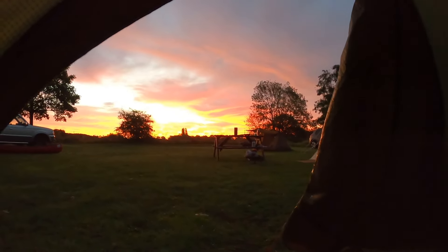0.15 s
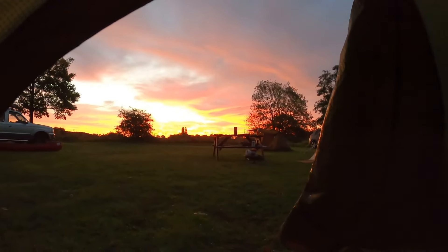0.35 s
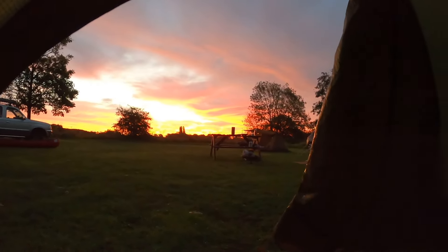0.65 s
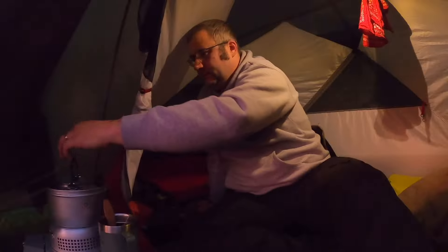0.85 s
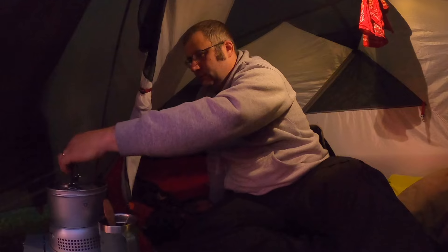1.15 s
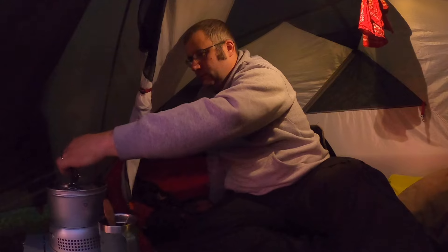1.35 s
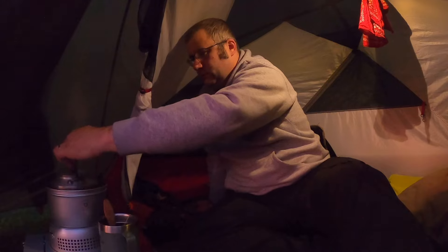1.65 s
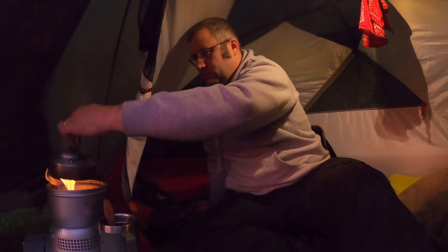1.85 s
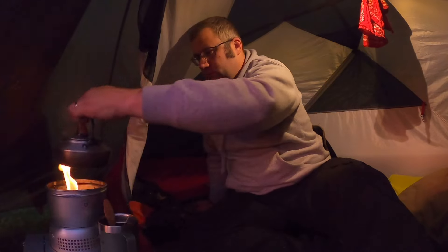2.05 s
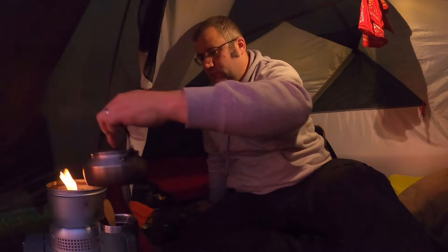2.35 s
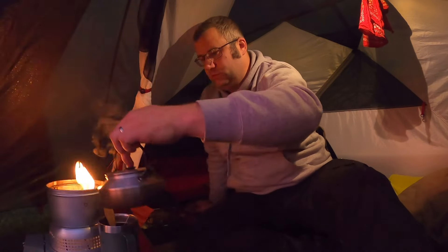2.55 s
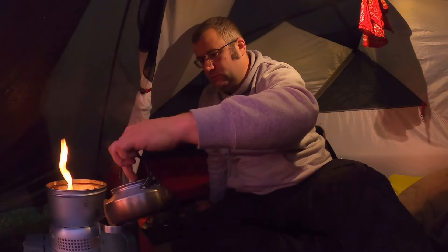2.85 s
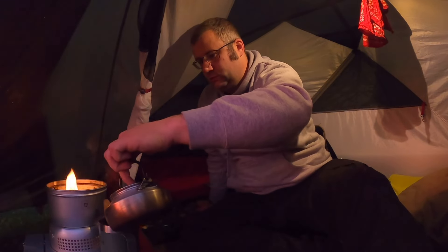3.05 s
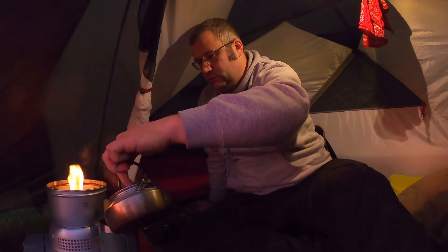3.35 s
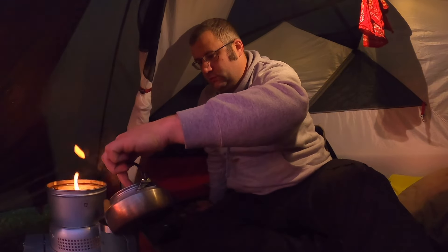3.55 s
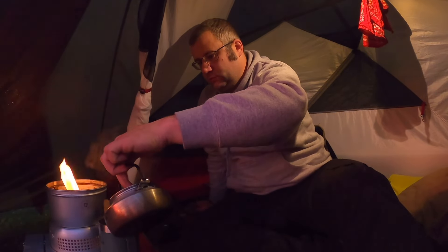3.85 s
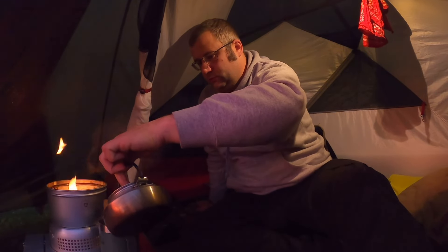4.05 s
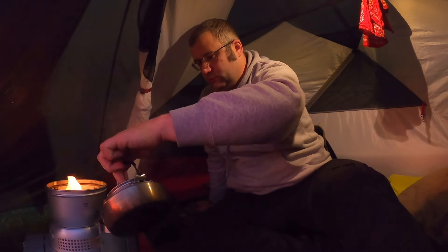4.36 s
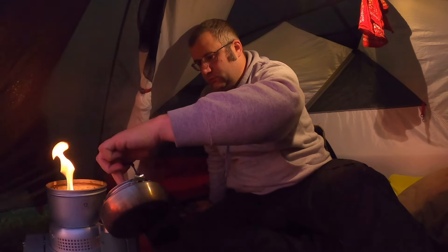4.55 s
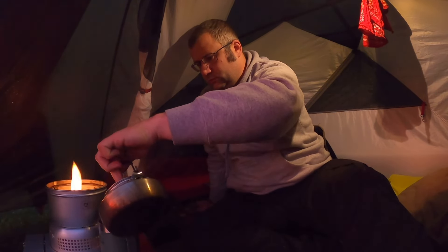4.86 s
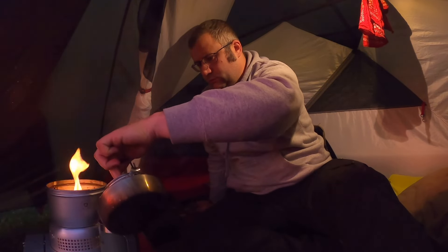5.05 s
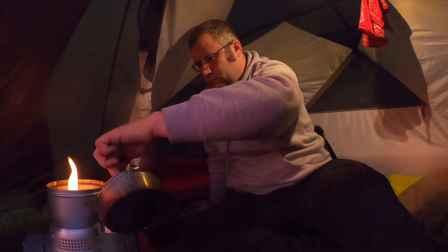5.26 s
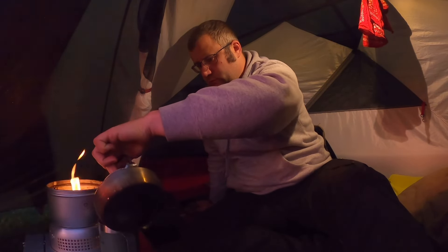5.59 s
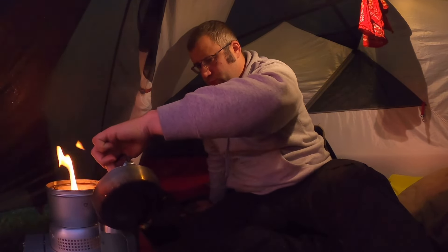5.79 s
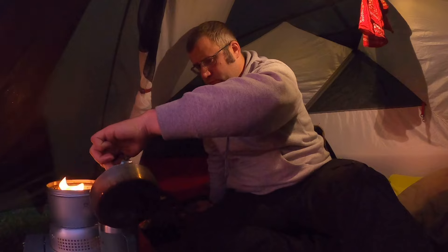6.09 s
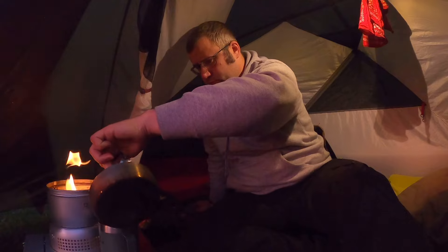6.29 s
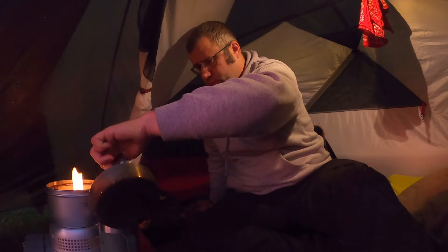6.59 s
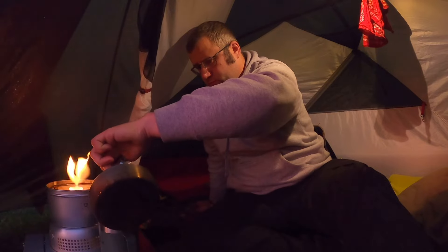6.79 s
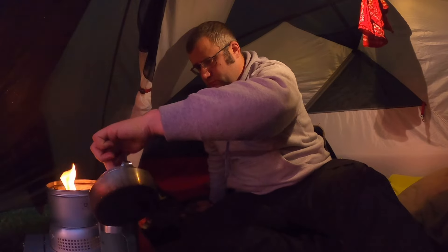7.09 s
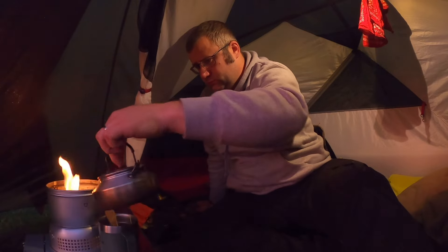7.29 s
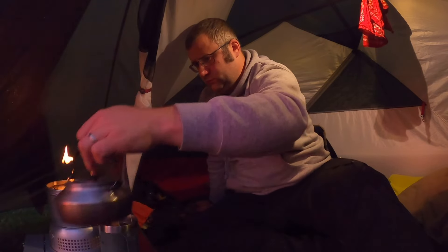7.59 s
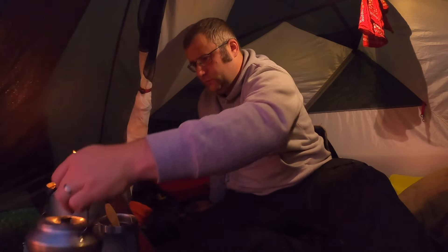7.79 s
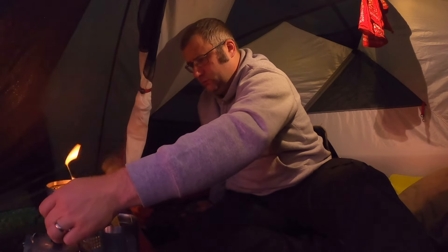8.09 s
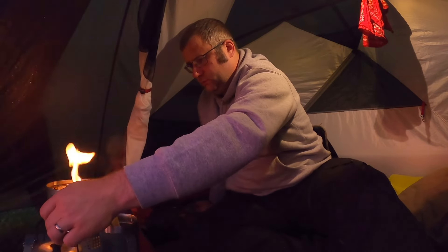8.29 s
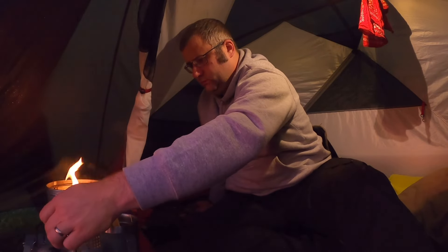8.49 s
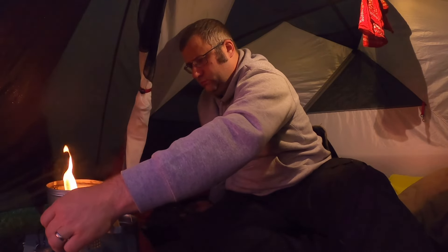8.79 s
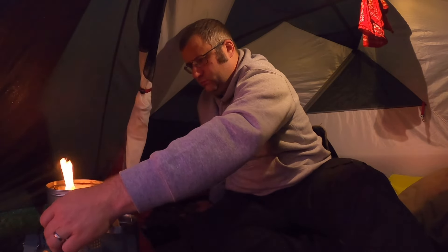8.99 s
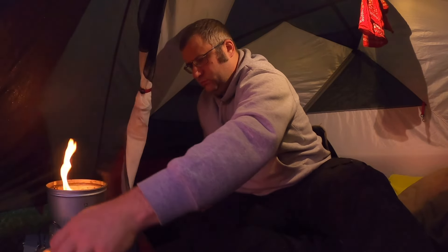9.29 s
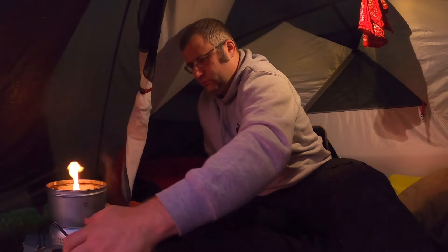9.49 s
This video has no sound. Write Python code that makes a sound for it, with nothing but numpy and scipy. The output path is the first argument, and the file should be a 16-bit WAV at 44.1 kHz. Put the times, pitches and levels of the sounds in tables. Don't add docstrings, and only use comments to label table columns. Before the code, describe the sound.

Quick sweeping birdsong cuts to a steaming kettle, a trickling pour ringing in a metal mug, a hard metallic clank, and a final three-note bird whistle.

```python
import sys
import numpy as np
from scipy import signal
from scipy.io import wavfile

SR = 44100
rng = np.random.default_rng(int(sys.argv[2]) if len(sys.argv) > 2 else 0)


def attenuation_scalar(level_db):
    decades = np.asarray(level_db, float) / 20
    return 10 ** decades


def master(y):
    cut = np.clip(np.atleast_2d(y).T, -1, 1)
    pcm = np.round(cut * 32767)
    wavfile.write(sys.argv[1], SR, pcm.astype(np.int16))


N = 425124
CHANGE_S = .7631

# f/Hz, level/dB, time to fade by 60 dB/s
MUG = [(866, -17, 0.091), (938, -17, 0.2), (1500, -9, 0.11), (2160, 0.5, 0.0097), (2680, -6, 0.042),
       (4290, -1, 0.017), (5900, -2.5, 0.019)]


def rms_one(x):
    return x / np.sqrt(np.mean(x ** 2) + 1e-20)


def in_time(rows):
    s, *columns = np.transpose(rows)
    return [np.interp(np.arange(N) / SR, s, c) for c in columns]


def ramp(span):
    return np.interp(np.arange(N) / SR, span, (0, 1))


def sounding(rows, db):
    t = np.arange(N) / SR
    start, end = rows[0][0], rows[-1][0]
    fades = np.minimum(t - start, end - t) * 10 + (start < 1)
    return attenuation_scalar(db) * np.clip(fades, 0, 1) * (t >= start)


def at_hz(points, hz):
    points = np.array(points)
    return np.interp(np.log(hz), np.log(points[:, 0]), points[:, 1])


def drift(rate):
    r = np.exp(-80 * np.pi * rate / SR)
    slow = signal.lfilter([1], [1, -2 * r, r * r], rng.standard_normal(N // 40 + 2002))[2000:]
    return np.interp(np.arange(N) / 40, np.arange(len(slow)), rms_one(slow))


def ring(clicks, hz, t60):
    r = attenuation_scalar(-60 / (t60 * SR))
    w = 2 * np.pi * hz / SR
    return signal.lfilter([0, np.sin(w)], [1, -2 * r * np.cos(w), r * r], clicks + 1e-18)


def band(x, low_hz, high_hz):
    return signal.sosfilt(signal.butter(2, [low_hz, high_hz], "band", fs=SR, output="sos"), x)


def low_pass(x, order, hz):
    return signal.sosfilt(signal.butter(order, hz, fs=SR, output="sos"), x)


def pan(x, left_db):
    return x * attenuation_scalar([[left_db / 2], [-left_db / 2]])


def banded_noise(spectrum, patchy_db, flicker, count):
    # f/Hz, likeness from 0 to 1
    likeness = [(60, 0.84), (150, 0.98), (380, 0.53), (940, 0.52), (2360, 0.79), (5910, 0.43),
                (14800, 0.083)]
    edges = np.geomspace(spectrum[0][0], spectrum[-1][0], count + 1)
    centres = np.sqrt(edges[1:] * edges[:-1])
    white, together, bands = rng.standard_normal((2, 2, N)), drift(4.6), []
    for k, hz in enumerate(centres):
        mid, side = band(white[k % 2], edges[k], edges[k + 1])
        alike = np.clip(at_hz(likeness, hz), 0, 1)
        gain = attenuation_scalar(at_hz(spectrum, hz) + patchy_db * (0.15 * together + drift(flicker)))
        bands.append(gain * (np.sqrt(1 + alike) * mid + np.sqrt(1 - alike) * side * [[1], [-1]]))
    bands = np.array(bands)
    return centres, bands / np.sqrt(np.mean(np.sum(bands, axis=0) ** 2))


def whistle(notes, rough_db, waver):
    out = np.zeros(N)
    flutter = attenuation_scalar(rough_db * drift(62))
    wobble = 1 + waver * drift(59)
    for rows in notes:
        s, hz, db = np.transpose(rows)
        at = np.arange(int(s[0] * SR), min(int(s[-1] * SR), N))
        t = at / SR
        ends = np.clip(np.minimum(t - s[0], s[-1] - t) / 0.0013, 0, 1)
        phase = np.cumsum(2 * np.pi * np.interp(t, s, hz) * wobble[at] / SR)
        out[at] += np.sqrt(2) * attenuation_scalar(np.interp(t, s, db)) * ends * flutter[at] * np.sin(phase)
    return out


def scatter(x, t60, wet_db, alike):
    t = np.arange(int(.6 * SR)) / SR
    mid, side = rng.standard_normal((2, len(t))) * attenuation_scalar(-60 * t / t60) * np.clip(t / 0.0061, 0, 1)
    cloud = mid + np.sqrt(np.clip(1 - alike, 0, 1)) * side * np.array([[1], [-1]])
    cloud = cloud / np.sqrt(np.sum(mid ** 2))
    return attenuation_scalar(wet_db) * signal.fftconvolve(x[None], cloud, axes=1)[:, :N]


def strike(hits, modes, shorten, crack_db, crack_hz):
    at = np.array([round(s * SR) for s, db in hits])
    db = np.array(hits)[:, 1]
    first, span = at[0], at[-1] - at[0] + SR // 2
    chance = rng.standard_normal((len(hits), len(modes)))
    out, clicks = np.zeros(N), np.zeros(span)
    for k, (hz, level_db, t60) in enumerate(modes):
        clicks[at - first] = attenuation_scalar(db + level_db + 1.1 * chance[:, k]) * np.sign(chance[:, 0])
        out[first:first + span] += ring(clicks, hz, np.clip(t60 * shorten, .01, .4))
    clicks[at - first] = attenuation_scalar(db + crack_db)
    fading = signal.lfilter([1], [1, -np.exp(-1 / (0.0015 * SR))], clicks + 1e-18)
    out[first:first + span] += band(fading * rng.standard_normal(span), crack_hz / 8, crack_hz)
    return out


def splashes(rows, splash_s, cycles, ring_db, mug_db, above):
    t = np.arange(int(.08 * SR)) / SR
    spray, rings = np.zeros((4, N + len(t))), np.zeros(N + len(t))
    noise = rng.standard_normal((len(rows), len(t))) * np.exp(-t / splash_s) * np.clip(t / .0012, 0, 1)
    for (s, peak_db, hz, spray_db, narrow_db), puff in zip(rows, noise):
        octaves_off = np.abs(np.log2(np.array((1150, 2500, 4950, 11000)) / (above * hz)))
        at = slice(round(s * SR), round(s * SR) + len(t))
        spray[:, at] += attenuation_scalar(spray_db - narrow_db * octaves_off)[:, None] * puff
        life = cycles / np.sqrt(hz * 1000)
        tone = np.sin(2 * np.pi * hz * t * (1 + 0.0266 * t / life))
        rings[at] += attenuation_scalar(peak_db + ring_db) * np.exp(-t / life) * np.clip(t * hz, 0, 1) * tone
    out = rings[:N]
    lows, highs, lifts_db = (730, 1800, 3500, 9000), (1800, 3500, 7000, 15000), (14.0, 13.5, 12, 15)
    for part, low_hz, high_hz, lift_db in zip(spray[:, :N], lows, highs, lifts_db):
        body = sum(attenuation_scalar(db + mug_db) * ring(part, hz, t60)
                   for hz, db, t60 in MUG if low_hz * 1.05 < hz < high_hz * 1.05)
        out = out + attenuation_scalar(lift_db) * (band(part, low_hz, high_hz) + body)
    return out


def road():
    # t/s, level/dB
    traffic = [
        (0, -60),
        (.76, -48.5),
        (1.0, -60),
        (2.2, -60),
        (4.3, -55.5),
        (4.7, -59),
        (5.7, -54),
        (9.64, -57.5),
    ]
    # f/Hz, level per Hz/dB
    rumble_colour = [(20, -12.5), (36, -9.5), (50, -2.5), (70, -7.5), (100, -5.5), (170, -8.5), (230, -11),
                     (330, -19.5), (420, -41.5)]
    # t/s, f/Hz, level/dB
    engine_path = [
        (7.6, 71.4, -67.5),
        (9.64, 71.57, -63.5),
    ]
    # multiple of the firing pitch, level/dB
    orders = [(1, -13), (2, 0.5), (3, 3.5), (4, -4.5)]
    deep_db, = in_time(traffic)
    upper_db = -64.5 + 0.075 * (deep_db - deep_db.mean())
    centres, bands = banded_noise(rumble_colour, patchy_db=2.5, flicker=6.9, count=11)
    deep, upper = rms_one(bands[centres < 90].sum(axis=0)), rms_one(bands[centres >= 90].sum(axis=0))
    hz, db = in_time(engine_path)
    phase = np.cumsum(2 * np.pi * hz * (1 + 0.02 * drift(8.23)) / SR)
    engine = sum(attenuation_scalar(level_db + 5.0 * drift(9) - 2) * np.sin(k * phase) for k, level_db in orders)
    lumps = attenuation_scalar(2.02 * drift(7.7))
    noise = lumps * (attenuation_scalar(deep_db) * deep + attenuation_scalar(upper_db + 2.5) * upper)
    return noise + sounding(engine_path, db) * engine


def field():
    # f/Hz, level per Hz/dB
    air_colour = [(330, -15.5), (500, -11.5), (900, -12.5), (1250, -5), (1600, -8), (2000, -11.5),
                  (3400, -21.5), (4000, -19.5), (4800, -24), (6500, -6), (8500, -45), (12500, -25),
                  (15000, -51)]
    # f/Hz, level per Hz/dB
    chorus_colour = [(3500, -15), (4300, -6.5), (5000, -0.5), (6000, -2.5), (7000, -0.5), (8200, -34.5)]
    # t/s, level/dB
    chorus_level = [(0, -64.5), (.76, -65), (.81, -60.5), (2.3, -71), (3.05, -74.5), (3.5, -69),
                    (4.1, -71.5), (4.8, -78), (5.6, -76), (6.2, -77), (7.4, -68), (8.0, -81.5), (9.64, -82)]
    chorus_db, = in_time(chorus_level)
    outdoors = int(CHANGE_S * SR)
    centres, air = banded_noise(air_colour, patchy_db=2.4, flicker=9.3, count=18)
    air[centres > 6800, :, :outdoors] *= attenuation_scalar(-8)
    hollow = attenuation_scalar(-7.5) * rms_one(ring(rng.standard_normal(N), 1270, 0.037))
    centres, chorus = banded_noise(chorus_colour, patchy_db=1.6, flicker=5, count=10)
    chorus[centres > 6500, :, :outdoors] *= attenuation_scalar(-6)
    out = attenuation_scalar(-70.5) * (air.sum(axis=0) + hollow) + attenuation_scalar(chorus_db) * chorus.sum(axis=0)
    dull = low_pass(out, 16, 6500) + attenuation_scalar(-6 + 5 * drift(15)) * band(out, 7800, 12000)
    return np.where(np.arange(N) < CHANGE_S * SR, dull, out)


def falling_notes():
    # t/s, level/dB
    falling = [
        (5.915, -72),
        (6.1, -68),
        (6.287, -71.5),
        (6.494, -66),
        (6.803, -68.5),
    ]
    notes = [[(s, 2350, db), (s + 0.022, 1300, db - 2)] for s, db in falling]
    return whistle(notes, rough_db=1.5, waver=0.03)


def far_whistles():
    # t/s, length/s, from f/Hz, to f/Hz, level/dB
    whistles = [(0.799, 0.095, 5370, 5320, -55.5), (0.814, 0.079, 6000, 5600, -64),
                (2.07, 0.065, 5120, 5140, -63.5), (3.3, .06, 5430, 5480, -78),
                (3.342, 0.084, 6100, 5970, -75), (6.595, 0.13, 5300, 5280, -79.5),
                (3.43, 0.18, 5900, 5750, -67.5), (3.436, 0.2, 5480, 5320, -65.5),
                (7.519, 0.13, 6710, 6620, -74), (7.853, 0.16, 5440, 5135, -62.5),
                (7.865, 0.13, 5800, 5640, -68), (8.308, 0.22, 4820, 4870, -77),
                (8.817, 0.11, 7540, 7560, -71), (8.968, 0.033, 4650, 4480, -69),
                (9.387, 0.08, 3780, 3640, -67)]
    shape = ((0, -8), (.15, 0), (.8, -3), (1, -14))
    notes = [[(s + share * length, a + share * (b - a), db + loss_db) for share, loss_db in shape]
             for s, length, a, b, db in whistles]
    return whistle(notes, rough_db=4.5, waver=0.0039)


def quick_glides():
    # t/s, length/s, from f/Hz, to f/Hz, level/dB
    glides = [(2.058, .016, 4760, 5100, -68), (2.447, 0.046, 4970, 5310, -67),
              (2.48, 0.017, 5220, 6440, -58.5), (2.567, 0.051, 4650, 4640, -71),
              (2.608, 0.024, 4620, 5300, -58), (2.726, 0.039, 4510, 6500, -60),
              (2.846, 0.045, 4470, 6720, -59.5), (6.266, .03, 5030, 5530, -74),
              (6.586, 0.021, 5060, 5500, -73), (6.868, 0.031, 2200, 1750, -74),
              (2.98, 0.05, 7350, 7500, -75), (3.027, .07, 7500, 7400, -78), (4.92, .08, 7800, 7730, -72),
              (9.563, 0.021, 4300, 8300, -64), (9.593, 0.023, 7380, 5100, -52),
              (9.603, 0.035, 7800, 7200, -59), (9.625, 0.012, 6270, 7400, -46.5)]
    notes = [[(s, a, db), (s + length, b, db - 9)] for s, length, a, b, db in glides]
    return whistle(notes, rough_db=2.0, waver=0.012)


def three_note_song():
    # t/s, f/Hz, level/dB
    high = [
        (8.972, 6400, -68),
        (8.99, 6590, -58),
        (9.04, 6760, -50.5),
        (9.09, 6830, -59),
        (9.108, 6630, -65),
    ]
    middle = [
        (9.102, 4810, -62),
        (9.14, 4540, -51),
        (9.161, 4560, -51),
        (9.185, 4300, -61),
        (9.198, 3800, -69),
    ]
    low = [
        (9.198, 3420, -61),
        (9.227, 3550, -53),
        (9.286, 3363, -51.5),
        (9.379, 3314, -56.5),
        (9.41, 3150, -52),
        (9.443, 3364, -58),
        (9.475, 3230, -89),
        (9.54, 3310, -81),
    ]
    return whistle([high, middle, low], rough_db=2.5, waver=0.0051)


def hooked(rows, hook, shape_db):
    start, top_at, middle_at, fall_left = hook
    return [[(s, start * top, db + shape_db[0]),
             (s + top_at * length, top, db + shape_db[1]),
             (s + middle_at * length, end + fall_left * (top - end), db + shape_db[2]),
             (s + length, end, db + shape_db[3])]
            for s, length, top, end, db in rows]


def near_bird():
    # t/s, length/s, top f/Hz, end f/Hz, level/dB
    upper = [(.115, 0.044, 6730, 5560, -44), (.227, 0.038, 6700, 5600, -44), (.325, 0.047, 6170, 5570, -42),
             (.429, 0.051, 6070, 5150, -48.5), (.54, 0.059, 6040, 5160, -51),
             (.649, 0.063, 6500, 5170, -49)]
    # t/s, length/s, top f/Hz, end f/Hz, level/dB
    lower = [(.029, 0.039, 5540, 3800, -42), (.154, 0.022, 5030, 3820, -37.5),
             (.265, 0.017, 4910, 3840, -37), (.36, 0.02, 5620, 3940, -40), (.462, 0.023, 5330, 3960, -38.5),
             (.573, 0.027, 5200, 3680, -41), (.69, 0.027, 5520, 4100, -40.5)]
    upper_hook, lower_hook = (.92, 0.18, 0.49, 0.43), (0.87, 0.22, 0.6, 0.5)
    upper_db, lower_db = (-4, 0, -1, -4), (-15, -6, 0, -13)
    notes = hooked(upper, upper_hook, upper_db) + hooked(lower, lower_hook, lower_db)
    return whistle(notes, rough_db=1.2, waver=0.004)


def birds():
    falling, far, song = falling_notes(), far_whistles(), three_note_song()
    glides, near = quick_glides(), near_bird()
    echoes = scatter(near, t60=0.14, wet_db=-10.0, alike=0.3)
    echoes += scatter(attenuation_scalar(-3) * far + attenuation_scalar(-6) * song + glides, t60=0.36, wet_db=-1, alike=0.17)
    leaves = scatter(attenuation_scalar(-17) * near + glides + attenuation_scalar(4) * falling, t60=0.025, wet_db=-6, alike=.6)
    leaves = low_pass(leaves, 6, 6900)
    near = near + attenuation_scalar(-9) * band(near ** 2, 7000, 14000)
    direct = pan(near, -1.5) + pan(far, -.6) + pan(song, 1.5) + pan(attenuation_scalar(-0.5) * glides, -.4)
    return direct + falling + echoes + leaves


def housing_knocks():
    # f/Hz, level/dB, time to fade by 60 dB/s
    housing = [(227, -4.5, 0.13), (406, -5.5, 0.09), (790, -18.5, 0.083), (114, -13.5, 0.033)]
    # t/s, level/dB
    hits = [
        (.186, -45),
        (.195, -30.5),
        (.215, -37.5),
        (.235, -39.5),
        (.595, -50),
        (.665, -48.5),
        (.695, -46),
    ]
    return band(strike(hits, housing, shorten=0.94, crack_db=-32, crack_hz=605), 60, 296)


def handling_push():
    # t/s, f/Hz, level/dB
    swell = [
        (.66, 206, -52),
        (.69, 142, -41.5),
        (.72, 68.7, -46.5),
        (.76, 40, -40),
    ]
    return whistle([swell], rough_db=0.5, waver=0.0079)


def flame_spits():
    # t/s, peak level/dB
    spits = [(2.4907, -57), (2.518, -51), (2.6077, -54), (2.8871, -62), (3.0123, -63), (3.161, -70),
             (3.209, -51), (3.2777, -67), (3.3585, -71), (3.4718, -57), (3.584, -74), (3.6484, -70),
             (3.7033, -59), (3.7307, -63), (3.7741, -67), (3.9143, -58), (3.9726, -62), (4.0071, -53),
             (4.0654, -55), (4.0899, -70), (4.1507, -52), (4.3174, -63), (4.35, -52), (4.4106, -69),
             (4.4466, -71), (4.5189, -73), (4.6401, -60), (4.7194, -62), (4.8053, -63), (4.8432, -66),
             (4.8724, -53), (4.923, -63), (5.0662, -66), (5.1116, -65), (5.3585, -65), (5.4737, -76),
             (5.596, -66), (5.8234, -71), (6.0165, -63), (6.1058, -72), (6.5228, -56), (6.7418, -73),
             (6.912, -60), (7.0252, -63), (7.125, -67)]
    return band(strike(spits, [], shorten=1, crack_db=-0.5, crack_hz=11900), 4500, 11400)


def steam():
    # t/s, level/dB
    hiss = [
        (.8, -66),
        (1.8, -67),
        (2.2, -66),
        (2.4, -80.5),
        (5.5, -78.5),
        (6.3, -88),
    ]
    # f/Hz, level per Hz/dB
    colour = [(330, -9), (520, -4.5), (750, -53), (1100, -13), (2200, -8), (4000, -8), (5600, -12),
              (8000, -15), (12700, -25.5), (15000, -32)]
    centres, bands = banded_noise(colour, patchy_db=.4, flicker=10, count=13)
    group = np.digitize(centres, (800, 4500))
    db, = in_time(hiss)
    body_db = -19 * ramp((1.8, 2.5))
    middle_db = 6 - 31.5 * ramp((0.59, 4.13)) * (1 - ramp((2.4, 3.2)))
    return sum(sounding(hiss, db + share_db) * rms_one(bands[group == k].sum(axis=0))
               for k, share_db in enumerate((body_db, middle_db, 0)))


def touches():
    # t/s, peak level/dB, ring f/Hz, spray level/dB
    rows = [
        (1.616, -42, 1840, -43),
        (1.639, -38.5, 1540, -39),
        (1.684, -50.5, 1550, -64),
        (2.813, -50, 1500, -58),
        (7.374, -55, 1250, -59),
        (9.025, -54, 1237, -67),
        (9.047, -53, 1004, -53.5),
        (9.158, -50.5, 580, -54.5),
        (9.181, -52, 1010, -65),
        (9.369, -56, 1250, -59),
    ]
    rows = [(*row, 10.5) for row in rows]
    return splashes(rows, splash_s=0.0081, cycles=8.3, ring_db=-3.5, mug_db=-45, above=1.81)


def lid():
    # f/Hz, level/dB, time to fade by 60 dB/s
    modes = [(3550, -13, 0.14), (3800, -2, 0.082), (4380, 1.5, 0.17), (4300, -3, 0.13), (4570, -14, .05),
             (5140, -4, 0.12), (5940, -18, 0.13), (5550, -15, 0.4), (6500, -29, 0.12), (6998, -9, 0.17),
             (9500, -12, 0.059)]
    # t/s, level/dB
    hits = [
        (3.209, -42),
        (3.214, -41),
    ]
    return strike(hits, modes, shorten=0.6, crack_db=-16, crack_hz=16000)


def rim():
    # f/Hz, level/dB, time to fade by 60 dB/s
    modes = [(4165, 0, 0.18), (4100, -5, 0.08)]
    # t/s, level/dB
    hits = [
        (3.658, -44.5),
        (3.693, -49),
        (3.712, -49),
    ]
    return strike(hits, modes, shorten=0.74, crack_db=6.0, crack_hz=6500)


def handle():
    # f/Hz, level/dB, time to fade by 60 dB/s
    modes = [(680, -7.5, 0.18), (1250, 5, 0.028), (1600, 1, 0.02), (1935, -17.5, 0.17), (2900, -2, 0.047),
             (2990, -18.5, 0.21), (3210, -17, 0.15), (4160, -25, .12), (4480, -22, 0.12), (5370, -18, .04)]
    # t/s, level/dB
    hits = [
        (7.4052, -39.5),
        (7.409, -39),
    ]
    return strike(hits, modes, shorten=0.68, crack_db=-6, crack_hz=5000)


def kettle_clank():
    # f/Hz, level/dB, time to fade by 60 dB/s
    kettle, wire = [(460, -23, 0.077), (700, -27, 0.021), (958, -25, 0.41), (1084, -12, 0.1),
                    (1110, -10, 0.071), (1280, -0.5, 0.042), (1510, -7.5, 0.059), (1950, -15, 0.054),
                    (2200, -10, 0.017), (2700, -6.5, 0.022), (4330, -24, 0.054), (5150, -15.5, 0.033),
                    (6000, -10, .02), (1432, -15, .17)], [(3430, 0, .3), (3390, -8, .2)]
    # t/s, level/dB
    kettle_hits = [
        (8.821, -46),
        (8.8278, -39),
        (8.8302, -24.5),
        (8.8323, -20),
        (8.836, -21.5),
        (8.8385, -26.5),
        (8.8435, -27),
        (8.851, -36),
        (8.862, -48),
    ]
    # t/s, level/dB
    wire_hits = [
        (8.8325, -56),
        (8.845, -56),
    ]
    clank = band(strike(kettle_hits, kettle, shorten=0.46, crack_db=1.5, crack_hz=4300), 430, 7300)
    return clank + strike(wire_hits, wire, shorten=1, crack_db=-30, crack_hz=4000)


def trickle():
    # t/s, level/dB
    flow = [
        (3.1, -65),
        (3.5, -70.5),
        (3.75, -62.5),
        (4.7, -64),
        (5.3, -70),
        (5.7, -68.5),
        (6.2, -83),
        (7.3, -74),
    ]
    # t/s, f/Hz, level/dB
    mug_air = [
        (5.38, 665, -86),
        (5.7, 700, -81.5),
        (6.05, 790, -87),
    ]
    db, = in_time(flow)
    drops_per_s = 420 * attenuation_scalar(0.32 * (db + 63.0))
    sizes = attenuation_scalar(4.5 * np.minimum(rng.exponential(1, N), 2.2)) * rng.choice([-1, 1], N)
    clumps = attenuation_scalar(6.8 * drift(9.2))
    marks = sizes * (rng.random(N) < drops_per_s * clumps / SR) + 1e-18
    fading = signal.lfilter([1], [1, -np.exp(-1 / (0.0016 * SR))], np.abs(marks))
    puffs = fading * rng.standard_normal(N)
    ticks = rms_one(band(puffs, 1760, 7100))
    pitches, dealt = np.geomspace(850, 6000, 10), rng.integers(0, 10, N)
    bubbles = rms_one(sum(ring(marks * (dealt == k), hz, 30.0 / hz) for k, hz in enumerate(pitches)))
    stream = rms_one(puffs) + attenuation_scalar(-25) * rng.standard_normal(N) * np.sqrt(clumps)
    wall = rms_one(sum(attenuation_scalar(db_mode) * ring(stream, hz, .7 * t60) for hz, db_mode, t60 in MUG))
    mix = attenuation_scalar(-7) * ticks + attenuation_scalar(-10) * bubbles + attenuation_scalar(-3) * wall
    mix = band(band(mix, 640, 8600), 600, 13000)
    fizz = attenuation_scalar(-10.5) * rms_one(band(stream, 11000, 13500))
    return sounding(flow, db) * (mix + fizz) + whistle([mug_air], rough_db=-5.0, waver=0.016)


def pouring():
    # t/s, peak level/dB, ring f/Hz
    glugs = [(3.185, -36, 760), (3.249, -36, 720), (3.272, -42.5, 770), (3.298, -41, 734), (3.44, -44, 720),
             (3.475, -44, 734), (4.225, -39, 900), (4.276, -46, 880), (4.335, -43, 870), (3.522, -30, 2060),
             (3.603, -37, 2180), (3.732, -41, 2560), (3.878, -27.5, 1500), (3.92, -21.5, 870),
             (4.021, -30.5, 2160), (4.09, -34, 1840), (4.255, -31.5, 910), (4.318, -28.5, 840),
             (4.578, -39, 2510), (4.701, -39, 1080), (7.053, -38.5, 1530), (7.279, -30.5, 700),
             (7.281, -44, 1270), (7.597, -36, 700), (7.604, -35.5, 835), (7.578, -51, 1150)]
    # t/s, peak level/dB, ring f/Hz, spray level/dB
    splats = [(3.16, -33.5, 690, -46), (3.212, -42, 4470, -50), (3.279, -25.5, 3380, -52.5),
              (3.4, -42, 3800, -67), (3.47, -38, 3000, -61), (3.49, -39, 3500, -62),
              (3.845, -46, 2560, -51), (3.649, -21, 2650, -44.5), (3.66, -21.5, 2220, -50),
              (3.691, -46, 2600, -48.5), (3.775, -28.5, 2080, -45.5), (3.825, -31, 2510, -50.5),
              (4.066, -43, 4500, -49), (4.12, -31.5, 2690, -45.5), (4.349, -40, 3900, -49),
              (4.452, -26, 938, -39.5), (4.519, -43, 2540, -47), (4.834, -83, 2720, -49.5),
              (5.065, -37, 1500, -44), (5.114, -30.5, 2620, -51.5), (5.209, -36, 2680, -55),
              (5.856, -46, 2940, -53), (6.743, -32.5, 3230, -51.5), (7.332, -45, 1630, -40.5),
              (7.402, -39, 1240, -61)]
    # t/s, peak level/dB, ring f/Hz
    drips = [(3.358, -52, 6000), (3.442, -44, 5700), (3.512, -47, 4100), (3.583, -51, 5350),
             (3.752, -43, 2060), (3.971, -64, 845), (4.007, -47, 2150), (4.151, -42.5, 6800),
             (4.162, -47.5, 1040), (4.2, -50, 930), (4.292, -41.5, 900), (4.41, -51, 4160),
             (4.551, -49, 2500), (4.662, -45.5, 1004), (4.683, -47, 1500), (4.725, -50, 4200),
             (4.769, -52, 4410), (4.804, -59, 2710), (4.862, -44, 2700), (4.875, -52, 960),
             (4.884, -45, 1030), (4.914, -52, 4340), (4.959, -48, 4330), (4.974, -47, 6780),
             (4.989, -52, 5900), (5.119, -43, 4230), (5.139, -57, 2710), (5.154, -46, 2740),
             (5.178, -47.5, 2720), (5.24, -49.5, 1270), (5.334, -55, 1270), (5.359, -46.5, 2700),
             (5.394, -47.5, 1330), (5.472, -49.5, 1270), (5.489, -44.5, 2930), (5.504, -48, 1280),
             (5.583, -49, 1460), (5.917, -52, 1950), (6.04, -59, 1360), (6.912, -55, 1500),
             (7.125, -50.5, 1480), (7.361, -51, 900), (7.362, -50, 6000), (7.375, -53, 2870),
             (4.529, -48, 4200), (4.578, -56, 4300), (4.687, -50, 1110), (8.233, -50.5, 1270)]
    blobs = [(s, db, hz, db - 7.5, 22) for s, db, hz in glugs]
    blobs += [(*row, 5) for row in splats]
    drops = [(s, db, hz, db - 10, 5.5) for s, db, hz in drips]
    water = splashes(blobs, splash_s=0.0033, cycles=6.8, ring_db=-16, mug_db=-34.5, above=0.92)
    water = water + trickle()
    water += splashes(drops, splash_s=0.0038, cycles=4.0, ring_db=-4.5, mug_db=-32.0, above=1.0)
    return water - .6 * band(water, 2950, 3750)


def scene():
    outside = pan(road(), -1.2) + field() + birds()
    handling = pan(housing_knocks(), -23.0) + handling_push()
    metal = lid() + rim() + handle() + kettle_clank()
    wet = pouring() + touches()
    near = pan(wet, 0.85) + pan(metal, 2.7) + scatter(wet + metal, t60=0.096, wet_db=-9.5, alike=0.88)
    near = low_pass(near, 3, 7800)
    return outside + handling + pan(flame_spits(), -5.3) + pan(steam(), -1.6) + near


def band_limit(x):
    return signal.sosfilt(signal.butter(12, 15400, fs=SR, output="sos"), x)


def record(dry):
    resume_s, fade_s = .8055, .012
    t = np.arange(N) / SR
    gate = (t < CHANGE_S) + np.clip((t - resume_s) / fade_s, 0, 1)
    after = np.maximum(t - CHANGE_S, 0)
    wobble = 0.086 * np.exp(-after / 0.0022) * np.cos(2 * np.pi * 97 * after)
    step = (t >= CHANGE_S) * (np.exp(-after / 0.001) + wobble)
    step -= (t < CHANGE_S) * np.exp(np.minimum(t - CHANGE_S, 0) / 0.003)
    x = dry * gate + attenuation_scalar(-45.0) * step
    x = signal.sosfilt(signal.cheby2(12, 70, 15800, fs=SR, output="sos"), x)
    return band_limit(x)


dry = scene()
out = record(dry)
master(out)
```